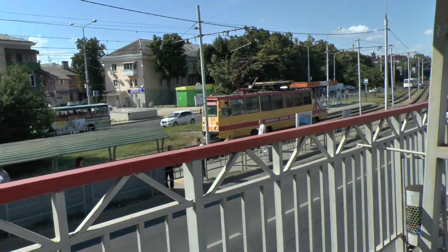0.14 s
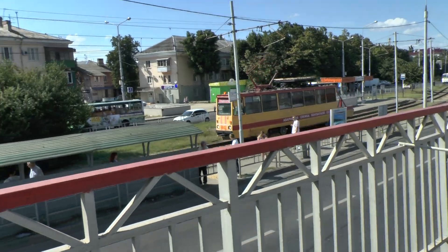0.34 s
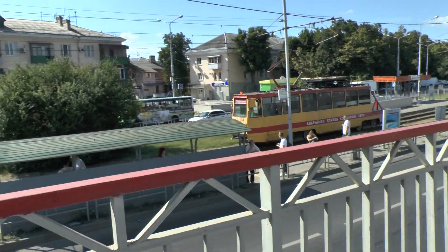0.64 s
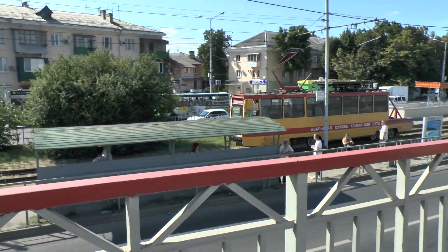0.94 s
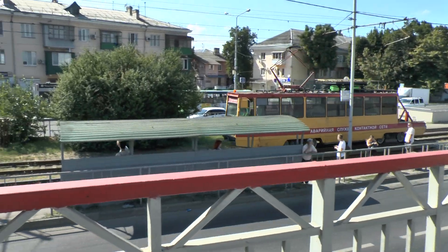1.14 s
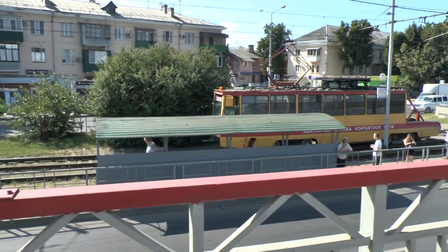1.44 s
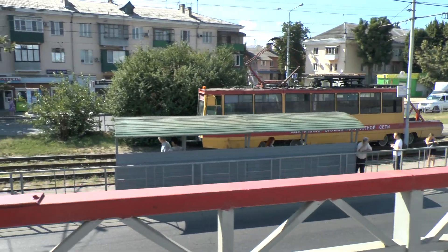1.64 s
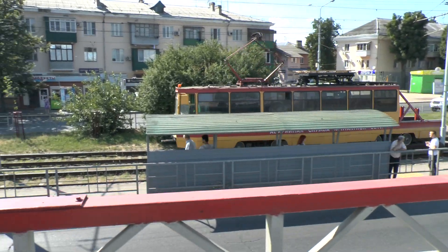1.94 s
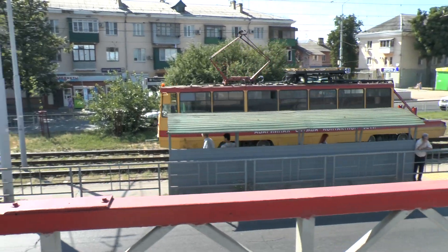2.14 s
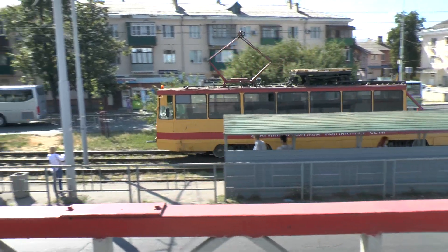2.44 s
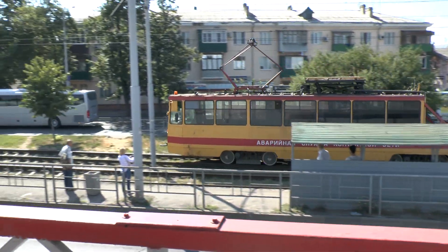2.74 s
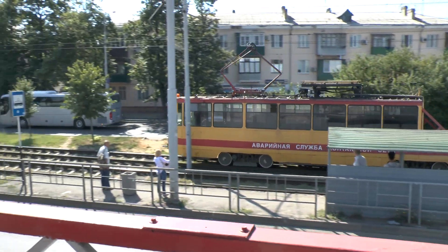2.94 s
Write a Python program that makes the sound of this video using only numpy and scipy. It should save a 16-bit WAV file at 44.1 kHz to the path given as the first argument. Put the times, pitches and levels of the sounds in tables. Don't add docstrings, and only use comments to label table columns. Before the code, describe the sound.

A tram rumbles and hisses along its rails past a street stop while wind buffets the microphone.

```python
import sys
import numpy as np
from scipy import signal
from scipy.fft import rfft, irfft, next_fast_len
from scipy.io import wavfile
from scipy.ndimage import uniform_filter1d, map_coordinates

SR = 44100
rng = np.random.default_rng(int(sys.argv[2]) if len(sys.argv) > 2 else 0)


def level_to_linear(level):
    exponent = np.asarray(level, float) / 20
    return 10 ** exponent


def log_audio(samples):
    frames = np.atleast_2d(samples).T
    limited = np.clip(frames, -1, 1)
    pcm = np.round(limited * 32767).astype(np.int16)
    wavfile.write(sys.argv[1], SR, pcm)


N = 136269


def unit(x):
    return x / np.sqrt(np.mean(x ** 2) + 1e-20)


def pan(db):
    return level_to_linear(db * np.array([[0.5], [-0.5]]))


def along(points, hz):
    f, v = np.transpose(points)
    return np.interp(np.log(hz + 1), np.log(f + 1), v)


def curves(rows):
    s, *columns = np.transpose(rows)
    return [np.interp(np.arange(N) / SR, s, column) for column in columns]


def wobble(rate_hz):
    return map_coordinates(rng.standard_normal(400), [np.arange(N) * rate_hz / SR])


def filtered(x, response):
    m = next_fast_len(N + SR // 2)
    return irfft(rfft(x, m) * response(np.fft.rfftfreq(m, 1 / SR)), m)[..., :N]


# frequency in Hz, left-right correlation.
LIKENESS = [(60, 0.89), (400, 0.89), (800, 0.83), (3000, 0.94), (8900, 0.92)]
MONO_ABOVE_HZ = 9050


def rush(spectrum, patchy_db):
    z = signal.stft(rng.standard_normal((2, N)), nperseg=512)[2]
    field = uniform_filter1d(rng.standard_normal(z.shape[1:]), size=6, axis=0)
    field = uniform_filter1d(field, size=8, axis=1)
    pair = signal.istft(z * level_to_linear(patchy_db * unit(field)), nperseg=512)[1][:, :N]
    shut = [(spectrum[0][0] / 2, -120), *spectrum, (spectrum[-1][0] * 1.1, -120)]

    def mid_side(hz):
        turn = np.arccos(np.clip(along(LIKENESS, hz), -1, 1)) / 2 * (hz < MONO_ABOVE_HZ)
        return level_to_linear(along(shut, hz)) * [np.cos(turn), np.sin(turn)]

    mid, side = filtered(pair, mid_side)
    return unit(np.array([mid + side, mid - side]))


def contact(start_s, length_s, t60_s, attack_s=0.00063):
    t = np.arange(N) / SR - start_s
    return np.clip(t / attack_s, 0, 1) * level_to_linear(-60 * np.clip(t - length_s, 0, 9) / t60_s)


def ring(modes, start_s, length_s, blur, flutter_db, attack_s=0.0079):
    t = np.arange(SR // 4) / SR
    out = np.zeros(N + SR)
    for hz, db, t60_s in modes:
        shake = uniform_filter1d(np.cumsum(rng.standard_normal(len(t))), size=60) * blur
        wobble_db = flutter_db * map_coordinates(rng.standard_normal(60), [t * 100])
        weight_db = db + wobble_db + 2 * rng.standard_normal()
        decay_db = -60 * np.clip(t - length_s, 0, 9) / t60_s
        shape = np.clip(t / attack_s, 0, 1) * level_to_linear(weight_db + decay_db)
        out[round(start_s * SR):][:len(t)] += np.sqrt(2) * shape * np.sin(2 * np.pi * hz * t + shake)
    return out[:N]


# time in s, rolling level in dB, brightness in dB, roar in dB.
ROLL_COURSE = [(.09, -38, -8, -1), (.3, -40, -6.5, -2), (.5, -42, -3.5, -2.5), (.8, -40.5, -4, -2),
               (1.1, -41.5, -1, -2.5), (1.48, -44.5, 3, -2.5), (1.62, -45.5, 3, 1.5), (1.9, -43.5, 2.5, -1),
               (2.2, -42.5, 1.5, -2.5), (2.45, -44, 3, -2.5), (2.55, -42.5, 5.5, -1), (3.09, -40.5, 2, -1)]
# frequency in Hz, level in dB per Hz.
RAIL_SPECTRUM = [(300, -20.5), (560, -4.5), (780, -4), (1000, -12), (1700, -11.5), (4500, -23),
                 (7500, -32.5), (9500, -55.5)]
# frequency in Hz, level in dB per Hz.
TYRE_SPECTRUM = [(6000, -1.5), (8500, 3.5), (11000, -5.5), (14000, -9.5), (16000, -14)]
# time in s, tyre hiss in dB.
CARS_COURSE = [(.09, 6.5), (.5, 3), (.9, 3), (1.15, 2), (1.35, 0.5), (1.6, 3), (1.9, -0.5), (2.4, -1),
               (2.7, 0.5), (3.09, 0)]
# frequency in Hz, level in dB per Hz.
ROAR_SPECTRUM = [(25, -30), (50, -3.5), (90, 0), (200, -1.5), (320, 0.5), (450, -13.5), (850, -12),
                 (1100, -52.5)]
TYRE_DB, ROAR_DB, RATTLE_DB = -32, -31, -15
RATTLE_PER_S, RATTLE_DECAY_S = 250, 0.0035


def rolling():
    level_db, bright_db, roar_db = curves(ROLL_COURSE)
    hiss = rush(RAIL_SPECTRUM, patchy_db=1.0)
    taps = (rng.random(N) < RATTLE_PER_S / SR) * level_to_linear(rng.standard_normal(N))
    decay = np.exp(-1 / (RATTLE_DECAY_S * SR))
    grains = signal.lfilter([1], [1, -decay], uniform_filter1d(taps, size=90))
    hiss = hiss * (1 + level_to_linear(RATTLE_DB) * unit(grains))
    high = filtered(hiss, lambda hz: 1 / (1 + (5000 / (hz + 1)) ** 2))
    tyres = level_to_linear(TYRE_DB + bright_db + curves(CARS_COURSE)[0]) * rush(TYRE_SPECTRUM, patchy_db=2.0)
    hiss = unit(hiss) + (level_to_linear(bright_db) - 1) * high + tyres
    roar = rush(ROAR_SPECTRUM, patchy_db=0.5) * level_to_linear(ROAR_DB + roar_db + 0.81 * wobble(24.84))
    return level_to_linear(level_db + 8 + 0.59 * wobble(14)) * hiss + roar * pan(-0.8)


# time in s, pitch in Hz, level in dB.
SING_COURSE = [(.09, 1650, -52), (.35, 1670, -47), (.5, 1660, -48), (.9, 1671, -43.5), (1.4, 1672, -54),
               (1.8, 1634, -47), (2, 1815, -59), (2.2, 1710, -65), (3.09, 1725, -64)]
SING_WIDTH_HZ = 60


def sing():
    hz, db = curves(SING_COURSE)
    slow = filtered(rng.standard_normal((2, N)), lambda f: 1 / (1 + (f / SING_WIDTH_HZ) ** 2))
    a, b = unit(slow)
    phase = 2 * np.pi * np.cumsum(hz) / SR
    return level_to_linear(db) * (a * np.sin(phase) + b * np.cos(phase))


# time in s, level in dB, flutter over rumble in dB.
BREEZE_COURSE = [
    (.1, -50, -20),
    (.5, -46, -19),
    (.85, -41, -5),
    (1.2, -32.5, -4),
    (1.48, -41, -9),
    (1.6, -37, 3.5),
    (2.25, -33.5, 9),
    (2.7, -34.5, 11),
    (3.02, -47, -13),
]
# time in s, level in dB, left over right in dB, gain duck in dB.
WIND_PUFFS = [(.36, -40, 10, 1.5), (0.42, -31.5, -9, 5), (0.453, -30, -1, 2.5), (.505, -41, 5, 1),
              (.55, -38, -3, 1), (0.625, -35, 0, 1), (0.721, -35, 10, 5), (0.767, -33, 17, 3.5),
              (0.871, -39, -3, 0), (1.013, -31.5, -6, 7.5), (1.108, -30.5, -7, 0.5), (1.18, -49, 0, 2.5),
              (1.224, -30, 4, -1), (1.391, -27, 2.5, 4.5), (1.545, -46, -2, -1), (1.573, -28, 1, 5.5),
              (1.607, -24.5, -0.5, 0.5), (1.74, -37, -5, 0), (1.822, -37.5, -7, 0), (1.882, -29, -4, 2),
              (2.032, -29, 1.5, 1.5), (2.08, -60, -1, 0.5), (2.212, -34, -9, -0.5), (2.382, -71, 29, 2),
              (2.52, -36, -5, 0), (2.642, -41, -7, 5.5), (2.719, -39, -13, -2.5), (2.933, -38.5, -15.5, 4),
              (2.971, -28.5, 10, 1)]
# frequency in Hz, level in dB per Hz.
GUST_SPECTRUM = [(25, -11), (60, -4), (120, -0.5), (500, -7.5), (850, -19.5), (950, -25), (2500, -37)]
# frequency in Hz, level in dB per Hz.
FLUTTER_SPECTRUM = [(120, -9), (280, -4.5), (390, -1), (550, -3), (800, -8), (950, -18), (1300, -18.5),
                    (2500, -34)]
PUFF_S, SWAY_DB = 0.015, 3
GUST_SHARED, FLUTTER_OPPOSED = 0.47, 0.73
LEE_DB = -2


def turbulence(spectrum):
    closed = [*spectrum, (6000, -93), (9000, -150)]
    return unit(filtered(rng.standard_normal((3, N)), lambda hz: level_to_linear(along(closed, hz))))


def wind():
    t = np.arange(N) / SR
    breeze_db, flutter_db = curves(BREEZE_COURSE)
    swell = level_to_linear(breeze_db + SWAY_DB * np.array([wobble(12), wobble(18)]))
    puffs = np.zeros((2, N))
    for s, db, pan_db, _ in WIND_PUFFS:
        puffs += level_to_linear(db) * pan(pan_db) * np.exp(-((t - s) / PUFF_S) ** 2)
    a, b, c = turbulence(FLUTTER_SPECTRUM)
    flutter = np.sqrt(FLUTTER_OPPOSED) * np.array([c, -c])
    flutter += np.sqrt(1 - FLUTTER_OPPOSED) * np.array([a, b])
    p, q, r = turbulence(GUST_SPECTRUM)
    gust = np.sqrt(GUST_SHARED) * r + np.sqrt(1 - GUST_SHARED) * np.array([p, q])
    mix = (gust + level_to_linear(flutter_db) * flutter) / np.sqrt(1 + level_to_linear(2 * flutter_db))
    return (swell + puffs) * mix * pan(LEE_DB)


# start in s, level in dB, length in s.
CHAIN_JINGLES = [(0.127, -71, 0.017), (1.14, -70, .02), (1.241, -66, 0.016), (1.967, -58, 0.024),
                 (2.028, -62.5, 0.0073), (2.174, -68, 0.023), (2.22, -66, 0.022), (2.499, -68, .02),
                 (2.567, -61, 0.035), (2.719, -65, 0.02), (2.77, -67, .01), (2.899, -65, .02),
                 (3.005, -66.5, 0.024)]
# frequency in Hz, level in dB, t60 in s.
CHAIN_MODES = [(5750, -6, .04), (7190, -1, 0.07), (8170, 0, 0.06), (9330, -3, .06), (10000, -4, 0.08),
               (11300, -10, .05), (12400, -13, .05), (13700, -14, 0.05)]
# frequency in Hz, level in dB per Hz.
GRIT_SPECTRUM = [(4000, -30), (5800, 0), (8000, -2), (10000, -7), (13500, -12), (15500, -20)]
# time in s, level in dB.
SPUTTER_COURSE = [(.09, -72), (.8, -74), (1.3, -70), (1.6, -72), (2.0, -65), (2.3, -66), (2.55, -60),
                  (2.68, -67), (2.8, -64), (3.09, -63)]
GRIT_DB, GRIT_T60_S = 7, 0.17


def chain():
    grit = rush(GRIT_SPECTRUM, patchy_db=7)
    out = level_to_linear(curves(SPUTTER_COURSE)[0]) * grit
    for s, db, length_s in CHAIN_JINGLES:
        links = ring(CHAIN_MODES, s, length_s, blur=0.085, flutter_db=3)
        out += level_to_linear(db) * (links + level_to_linear(GRIT_DB) * contact(s, length_s, GRIT_T60_S) * grit)
    return out


# time in s, peak in dB.
RAIL_BUMPS = [(0.244, -22.5), (0.323, -26), (0.62, -26), (0.799, -30), (1.207, -36), (1.431, -20.5),
              (1.53, -36), (1.799, -29), (1.999, -31), (2.08, -26), (2.135, -31.5), (2.341, -27.5),
              (2.58, -34), (2.811, -43), (2.85, -39), (2.961, -23), (3.006, -27), (3.029, -26.5)]
# frequency in Hz, level in dB, t60 in s.
WHEEL_MODES = [(590, -2, .07), (780, -1, .07), (690, -5, .05), (850, -5, .05), (1090, -4, .05),
               (1400, -3, .04), (1900, -6, .04), (2250, -10, .04)]
BUMP_DB, BUMP_S, WHEEL_BLUR, WHEEL_FLUTTER_DB = -11.5, 0.015, 0.05, 2.2


def bumps():
    out = np.zeros(N)
    for s, db in RAIL_BUMPS:
        wheel = ring(WHEEL_MODES[:4], s - 0.004, BUMP_S, WHEEL_BLUR, WHEEL_FLUTTER_DB, attack_s=0.0067)
        out += level_to_linear(db + BUMP_DB) * wheel
    return out


# time in s, clack in dB, thump in dB.
RAIL_JOINTS = [
    (.258, -44, -45),
    (0.559, -42.5, -47),
    (1.09, -42, -49),
    (1.274, -38, -48),
    (1.429, -39.5, -39),
    (1.657, -38.5, -40),
    (2.279, -32.5, -46),
    (2.497, -37, -33),
]
# frequency in Hz, level in dB per Hz.
CRACK_SPECTRUM = [(400, -5), (800, 2), (1300, -2), (2200, -1), (3200, -11), (4500, -19), (8000, -32)]
# frequency in Hz, level in dB per Hz.
THUMP_SPECTRUM = [(50, -10), (110, 12), (300, -3), (450, -20)]
WHEEL_DB, CRACK_S, CRACK_T60_S = -3, 0.013, 0.05


def joints():
    crack, thump = rush(CRACK_SPECTRUM, patchy_db=0.5), rush(THUMP_SPECTRUM, patchy_db=3.0)
    out = np.zeros((2, N))
    for s, clack_db, thump_db in RAIL_JOINTS:
        wheel = ring(WHEEL_MODES, s, 0.012, WHEEL_BLUR, WHEEL_FLUTTER_DB, attack_s=0.0029)
        out += level_to_linear(clack_db) * (level_to_linear(WHEEL_DB) * wheel + contact(s, CRACK_S, CRACK_T60_S) * crack)
        out += level_to_linear(thump_db) * contact(s, 0.032, 0.14, attack_s=0.0087) * thump
    return out


# start in s, level in dB, length in s, scrape over ring in dB.
BAR_CLANKS = [(.932, -66, .024, 11), (1.248, -63, .03, 12), (1.439, -46, 0.03, -10),
              (1.652, -43, 0.026, -4), (1.702, -68, 0.028, -7), (2.274, -56, 0.011, 2),
              (2.362, -52, .02, -6), (2.497, -49, 0.03, 0), (2.524, -53.5, 0.044, -1), (2.575, -57, .03, 5),
              (2.74, -62, .04, 3), (2.77, -66, 0.033, 3), (3.06, -66, .05, 10)]
# frequency in Hz, level in dB, t60 in s.
BAR_MODES = [(4730, 3, 0.11), (4700, -3, .09), (4722, -10, .5), (4480, -10, .06), (5280, -11, .09),
             (13810, -26, .16), (13950, -29, .1), (14400, -31, .08), (15300, -29, .06)]
# frequency in Hz, level in dB per Hz.
SCRAPE_SPECTRUM = [(1200, -40), (2000, 0), (5000, 6), (9000, -20), (13000, -7), (15500, -4), (16300, -22)]
BAR_BLUR, BAR_FLUTTER_DB, BAR_PAN_DB, SCRAPE_T60_S = 0.06, 2.2, -3, 0.1


def bar():
    scrape = rush(SCRAPE_SPECTRUM, patchy_db=1)
    out = np.zeros((2, N))
    for s, db, length_s, scrape_db in BAR_CLANKS:
        tone = ring(BAR_MODES, s, length_s, BAR_BLUR * level_to_linear(scrape_db / 2), BAR_FLUTTER_DB)
        rub = contact(s, length_s / 2, SCRAPE_T60_S, attack_s=0.0038) * scrape
        out += level_to_linear(db) * (tone + level_to_linear(scrape_db) * rub)
    return out * pan(BAR_PAN_DB)


def scene():
    return rolling() + sing() + wind() + chain() + bumps() + joints() + bar()


# frequency in Hz, half width in Hz, gain in dB.
HOUSING_RESONANCES = [(496.4, 24.3, -11), (655, 19.8, -9), (912, 70, -7.5), (1147, 59, -7),
                      (1302, 70, -9.5), (1555, 57.5, -13.5), (1584, 80, 5), (1137, 35, 3)]


def housing(x):
    return filtered(x, lambda f: level_to_linear(sum(db / (1 + ((f - hz) / width_hz) ** 2)
                                         for hz, width_hz, db in HOUSING_RESONANCES)))


ATTACK_S, RELEASE_S = 0.0031, 0.055


def gain_control(x):
    t = np.arange(N) / SR
    duck_db = np.zeros(N)
    for s, _, _, db in WIND_PUFFS:
        recovery = np.exp(-np.clip(t - s, 0, 9) / RELEASE_S)
        duck_db += np.abs(db) * np.clip((t - s) / ATTACK_S, 0, 1) * recovery
    return x * level_to_linear(-duck_db)


def roll_off(x):
    return signal.sosfilt(signal.butter(12, 16440, fs=SR, output="sos"), x)


START_S = 0.0813


def record(dry):
    mix = gain_control(housing(dry)) * (np.arange(N) / SR > START_S)
    return roll_off(mix)


dry = scene()
out = record(dry)
log_audio(out)
```